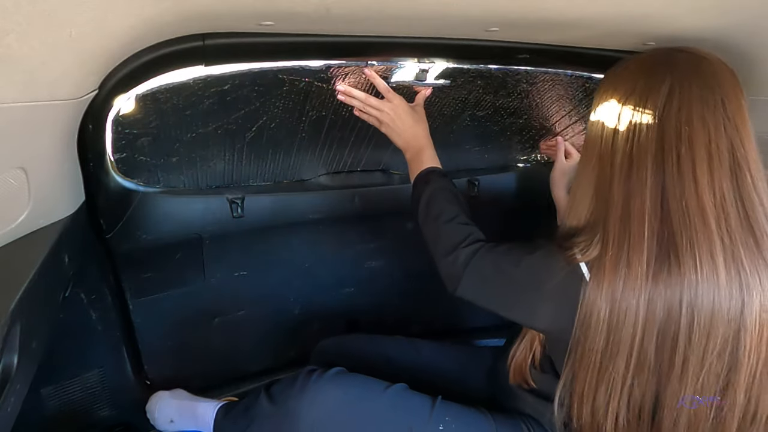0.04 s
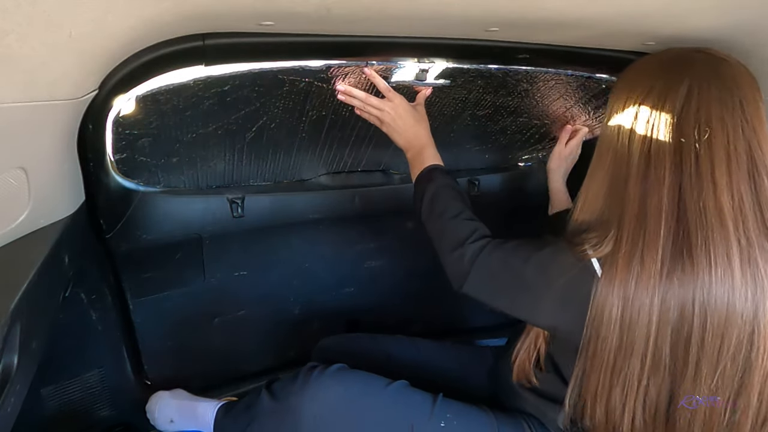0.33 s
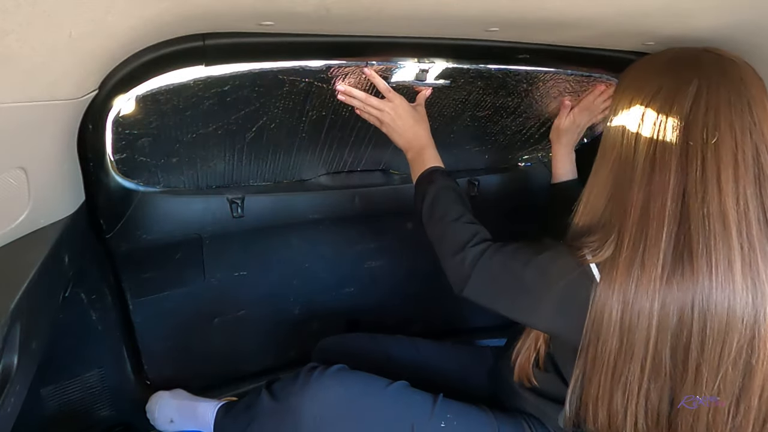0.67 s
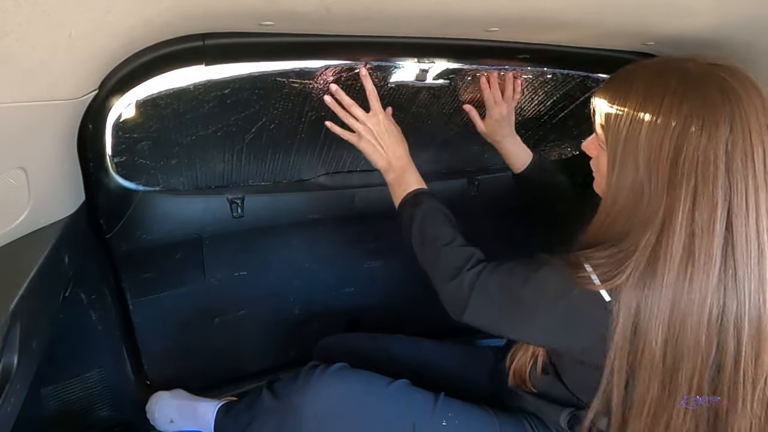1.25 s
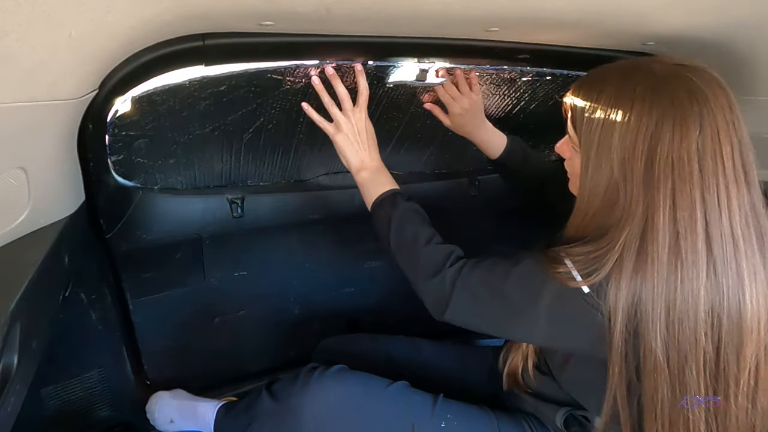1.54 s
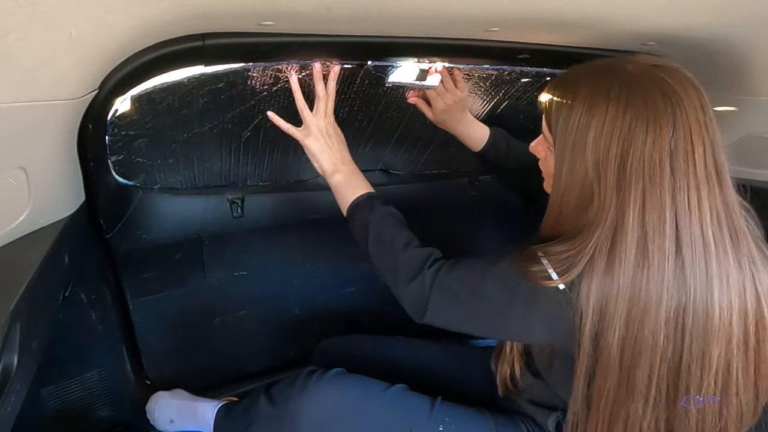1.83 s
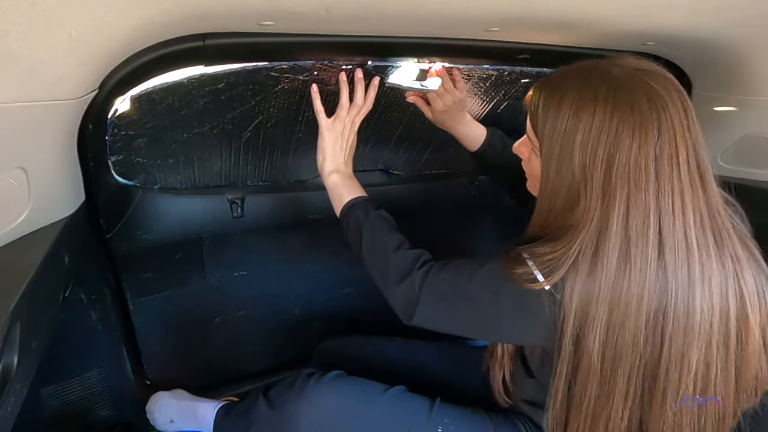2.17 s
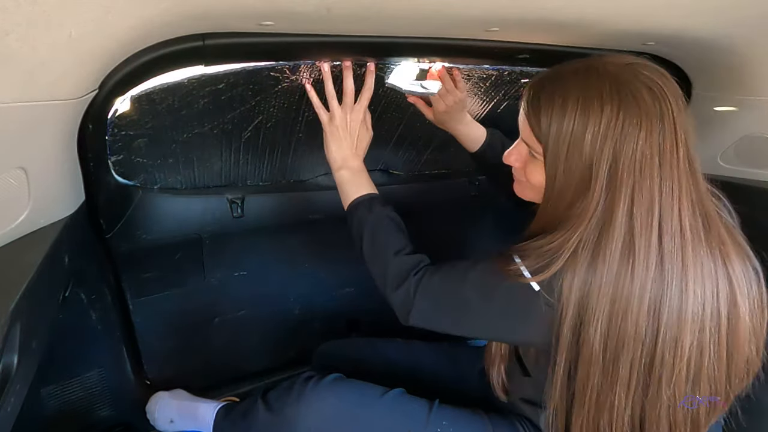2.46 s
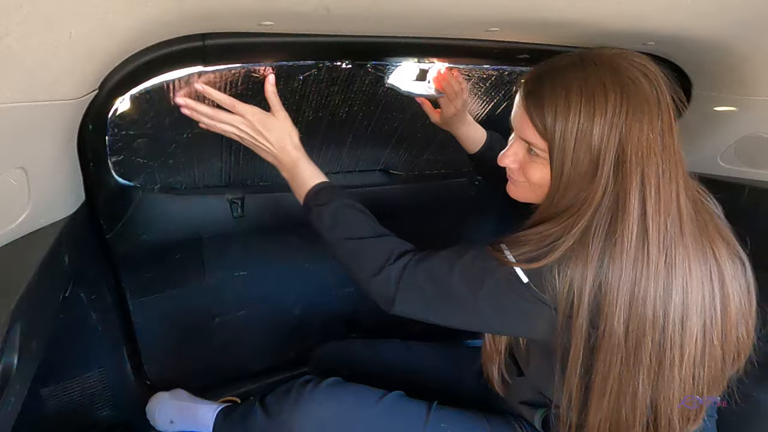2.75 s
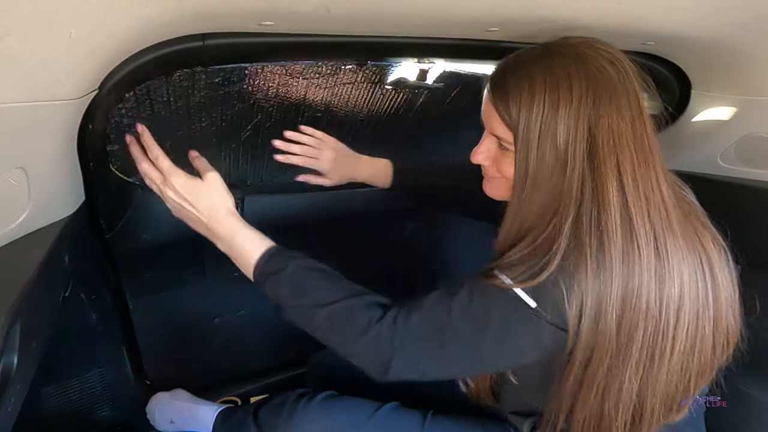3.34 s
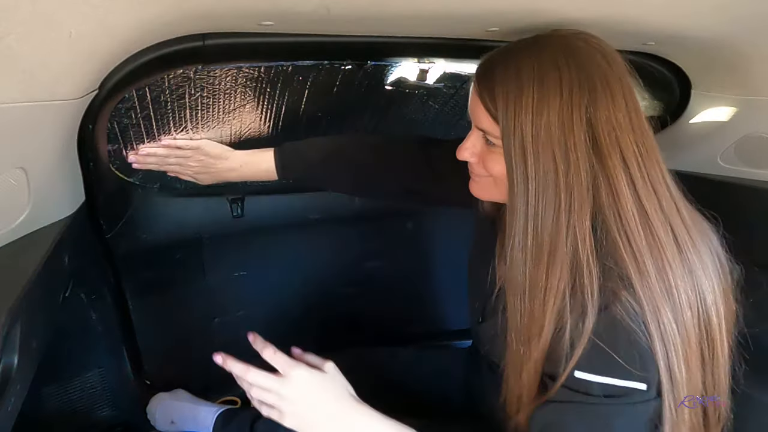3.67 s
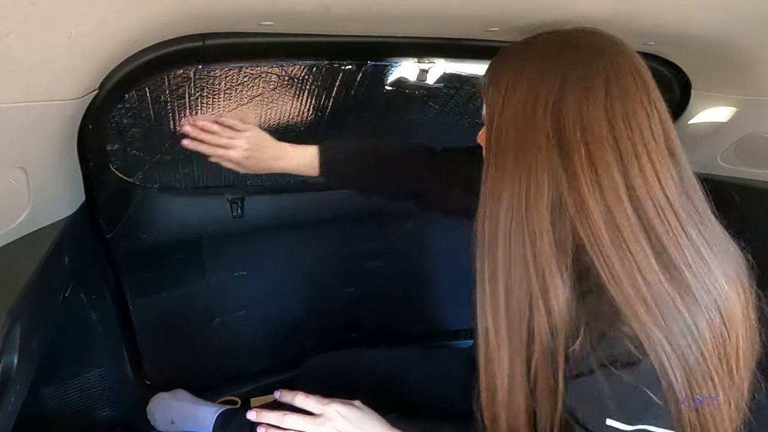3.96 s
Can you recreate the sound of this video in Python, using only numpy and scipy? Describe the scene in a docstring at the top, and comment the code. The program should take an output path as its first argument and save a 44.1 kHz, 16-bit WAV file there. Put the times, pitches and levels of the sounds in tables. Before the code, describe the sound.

A foil insulation sheet crackles under rubbing hands, close up inside a quiet car. During the first second, short rustles come with soft thumps and scuffs on the trim. A sharp snap at 1.3 seconds leads into longer rubbing, thinning to separate clicks from about 2 seconds. Louder snaps come near 2.6 and around 3 seconds with faint thumps, then a last hissing rub from 3.6 to 3.8 seconds.

```python
"""A foil insulation sheet crackles as hands press and rub it into a side window of a parked car.
Countless tiny buckles tick over the hiss of sliding skin, and larger creases flip with a sharp snap.
The trim behind the sheet thumps under the palms and scuffs under the fingers.
The small padded cabin answers each click briefly; the sound is almost mono."""
import sys
import numpy as np
from scipy import signal
from scipy.fft import rfft, irfft, next_fast_len
from scipy.io import wavfile
from scipy.ndimage import uniform_filter1d, map_coordinates

SR = 44100
rng = np.random.default_rng(int(sys.argv[2]) if len(sys.argv) > 2 else 0)


def put_to_file(sound):
    """Save the sound as 16-bit audio at rate SR, in the file named by the first command-line argument."""
    columns = np.atleast_2d(sound).T  # one column per channel
    safe = np.clip(columns, -1, 1)
    whole_steps = np.round(safe * 32767)
    wavfile.write(sys.argv[1], SR, whole_steps.astype(np.int16))


N = 176400

# tone of a foil click's crisp layer and of its duller flex: (frequency [Hz], relative level [dB])
CRISP_TONE = [(1500, -26), (3500, -5), (5000, -8.5), (7000, -2), (8500, 3.5), (9300, -6), (10600, -11.5),
              (12000, -4.5), (12600, -10.5), (16000, -19)]
DULL_TONE = [(60, -20), (180, -9.5), (500, -4.5), (650, -9), (1000, -8.5), (1350, -1), (3600, 0.5),
             (5200, -2.5), (10000, -54.5)]


def amp(db):
    """Decibels to gain."""
    return 10 ** (np.asarray(db) / 20)


def unit(x):
    """Scale to rms 1."""
    return x / np.sqrt(np.mean(x ** 2) + 1e-20)


def eq_gain(curve, hz):
    """Gain of an EQ curve drawn through (Hz, dB) points on a log frequency axis."""
    points_hz, db = np.transpose(curve)
    return amp(np.interp(np.log(hz + 1), np.log(points_hz + 1), db))


def filtered(x, response):
    """Filter x by a gain given as a function of frequency."""
    size = next_fast_len(N + SR // 2)
    return irfft(rfft(x, size) * response(np.fft.rfftfreq(size, 1 / SR)), size)[..., :N]


def add(track, start, sound):
    """Mix a sound into the track, start seconds in."""
    part = track[max(round(start * SR), 0):][:len(sound)]
    part += sound[:len(part)]


def wobble(per_s):
    """A smooth random curve through per_s points a second."""
    points = rng.standard_normal(int(N * per_s / SR) + 4)
    return map_coordinates(points, [np.arange(N) * per_s / SR])


def resonate(x, hz, width_hz):
    """Ring one resonance whose centre may glide; comes out at rms 1."""
    turn = np.exp(2j * np.pi * np.cumsum(np.broadcast_to(hz, N)) / SR)
    pole = np.exp(-np.pi * width_hz / SR)
    return unit(np.real(turn * signal.lfilter([1], [1, -pole], x / turn)))


def cabin_tone(level_db=-62):
    """The quiet cabin: a faint bed of bass-heavy noise."""
    # tone of the bed: (frequency [Hz], relative level [dB])
    bed_tone = [(20, 3.5), (300, -23.5), (1000, -22.5), (4000, -31.5), (16000, -42)]
    return amp(level_db) * unit(filtered(rng.standard_normal(N), lambda hz: eq_gain(bed_tone, hz)))


def finger_scuffs(rise_s=0.0063, t60_s=0.097, stage_q=1.75):
    """Brief bursts of finger friction in a hollow resonance of the trim."""
    # scuffs on the trim: (time [s], level [dB], resonance [Hz])
    scuffs = [(.094, -31, 607), (.295, -45, 690), (0.673, -50, 617), (0.931, -53, 540), (3.319, -39.5, 820)]
    out, t = np.zeros(N), np.arange(SR // 4) / SR
    envelope = (1 - np.exp(-t / rise_s)) * amp(-60 * t / t60_s)
    for start, db, hz in scuffs:
        b, a = signal.iirpeak(hz, stage_q, SR)
        friction = rng.standard_normal(len(t))
        scuff = unit(signal.lfilter(b, a, signal.lfilter(b, a, friction)))
        add(out, start, amp(db) * scuff * envelope / envelope.max())
    return out


def palm_thumps(rise_s=0.01, reach_octaves=0.53, rumble_db=-4, rumble_t60_s=0.33):
    """Soft pushes ring the trim's modes near each push's pitch; the panel rumbles on as it flexes."""
    # palm presses on the trim: (time [s], level [dB], centre of the push [Hz])
    presses = [(.045, -43, 180), (0.091, -31.5, 188), (.298, -38.5, 275), (0.396, -43.5, 48),
               (0.509, -37, 113), (.575, -43.5, 304), (0.779, -37.5, 53), (0.792, -33.5, 119),
               (0.873, -42, 115), (0.994, -50, 367), (1.277, -45, 153), (1.304, -40, 67), (2.16, -58, 214),
               (2.635, -46.5, 194), (2.88, -49, 130), (2.965, -45, 185), (3.06, -50.5, 138),
               (3.204, -40, 56.7), (3.564, -52, 64), (3.768, -57.5, 400)]
    # modes of trim and cabin: (frequency [Hz], relative level [dB], 60 dB decay time [s])
    trim_modes = [(48, -4.5, 0.47), (74, -3, 0.14), (115, 3.5, 0.19), (142.6, 7, 0.098),
                  (196.7, -1.5, 0.19), (239.5, -6.5, 0.12), (314, -2.5, 0.071), (369.4, 2.5, 0.091)]
    out, t = np.zeros(N), np.arange(SR // 2) / SR
    mode_hz, mode_db, t60_s = np.transpose(trim_modes)[:, :, None]
    hz = np.fft.rfftfreq(len(t), 1 / SR) + 1
    attack = 1 - np.exp(-(t / rise_s) ** 2)
    for start, db, centre_hz in presses:
        gains = amp(mode_db) * np.exp(-np.abs(np.log2(mode_hz / centre_hz)) / reach_octaves)
        tones = np.sin(2 * np.pi * (mode_hz * t + rng.random(mode_hz.shape)))
        ring = attack * (gains * amp(-60 * t / t60_s) * tones).sum(0)
        ring /= np.sqrt(uniform_filter1d(ring ** 2, size=600).max())  # rms 1 at its loudest
        band = np.exp(-2 * np.log2(hz / centre_hz) ** 2)
        flex = unit(irfft(rfft(rng.standard_normal(len(t))) * band, len(t)))
        rumble = attack * flex * amp(rumble_db - 60 * t / rumble_t60_s)
        add(out, start, amp(db) * (ring + rumble))
    return out


def cabin_response(size, tail_db=-0.9, build_s=0.00045, t60_s=0.058):
    """The direct sound, then a tail of reflections that the padding soon soaks up."""
    t = np.arange(size) / SR
    response = rng.standard_normal(size) * amp(-60 * t / t60_s) * (1 - np.exp(-t / build_s))
    response *= amp(tail_db) / np.linalg.norm(response)
    response[0] = 1
    return response


def buckle(tone, size=4096, colour_spread_db=3, pitch_spread=0.061):
    """One foil click of energy 1: a sharp tick with its own colour and pitch, heard in the cabin."""
    hz = np.fft.rfftfreq(size, 1 / SR)
    colour_db = colour_spread_db * np.interp(hz, np.linspace(0, SR / 2, 24), rng.standard_normal(24))
    detune = np.exp(pitch_spread * rng.standard_normal())
    spectrum = eq_gain(tone, hz * detune) * amp(colour_db)
    # minimum phase packs the energy into the attack
    cepstrum = irfft(np.log(spectrum))
    cepstrum[1:size // 2] *= 2
    cepstrum[size // 2 + 1:] = 0
    tick = irfft(np.exp(rfft(cepstrum)))
    click = signal.fftconvolve(tick, cabin_response(size))[:size]
    return click / np.linalg.norm(click)


def crease_snaps(boost_db=9.5, chain_clicks=3, chain_gap_s=0.003, chain_step_db=-6.5):
    """Larger creases flip, each setting off weaker neighbours; returns the crisp and dull layers."""
    # snapping creases: (time [s], relative level [dB], dull over crisp [dB])
    snaps = [(0.3317, -24.5, 5.5), (0.8162, -23.5, -5), (1.189, -26, -25), (1.2859, -14.5, -6.5),
             (1.3186, -22.5, 1), (1.4189, -20.5, -7.5), (1.4469, -29, -3), (1.473, -34, -15),
             (1.8199, -25, -6.5), (1.9046, -25, -7), (1.929, -24.5, -9.5), (2.0045, -33, -23),
             (2.066, -29, -15), (2.0823, -32.5, -13), (2.1639, -44, 5), (2.2029, -43, 0.5),
             (2.363, -35, -26), (2.387, -28.5, -15), (2.4264, -31, -12), (2.540, -29, -5),
             (2.568, -33.5, 6), (2.582, -27, -7), (2.616, -32, 6), (2.6354, -15.5, -5), (2.9354, -17.5, -1),
             (2.9859, -21.5, -7.5), (3.0458, -23.5, -22), (3.0997, -15, -19), (3.2628, -28, -15),
             (3.8888, -30, -24)]
    crisp, dull = np.zeros((2, N))
    for start, db, dull_over_db in snaps:
        for k in range(chain_clicks):
            gain = amp(db + boost_db + k * chain_step_db)
            add(crisp, start, gain * buckle(CRISP_TONE))
            add(dull, start, gain * amp(dull_over_db) * buckle(DULL_TONE))
            start += chain_gap_s * (.5 + rng.random())
    return np.array([crisp, dull])


def rub_envelopes(rise_s=0.013, fall_s=0.018, taper=0.76, idle_db=-78.0):
    """Each rub swells, holds and lets the foil settle; returns the crisp and dull envelopes in dB."""
    # rubs over the sheet: (start [s], end [s], relative crisp level [dB], dull over crisp [dB])
    rubs = [(0, 0.105, -31, -1), (0.131, 0.202, -38, -1), (0.22, 0.33, -40, -4.5),
            (0.349, 0.401, -38.5, -1), (0.526, 0.561, -37, -0.5), (0.681, .76, -52.5, 0),
            (0.774, 0.785, -34.5, -3.5), (0.819, 0.838, -45.5, -0.5), (0.858, 0.994, -55, -7),
            (0.973, 1.049, -46, -1), (1.12, 1.164, -60, -1), (1.186, 1.276, -43.5, -4.5),
            (1.261, 1.305, -37, -2), (1.325, 1.396, -49.5, -1), (1.444, 1.679, -39.5, -9),
            (1.707, 1.945, -43, -8), (1.96, 2.127, -55, -3.5), (2.429, 2.504, -41.5, -2.5),
            (2.57, 2.627, -48, 4.5), (2.68, 2.856, -69, 6.5), (2.874, 2.908, -43, -1.5),
            (2.904, 2.975, -38, -4), (3.065, 3.087, -38.5, -5.5), (3.203, 3.208, -33, -1),
            (3.302, 3.344, -49, -3), (3.561, 3.79, -40.5, -3), (3.788, 3.861, -50.5, -1),
            (3.957, 3.994, -43, -4.5)]
    t = np.arange(N) / SR
    crisp_db, dull_db = np.full((2, N), idle_db)
    for start, end, db, dull_over_db in rubs:
        fade = np.maximum(start - t, 0) / rise_s + np.maximum(t - end, 0) / fall_s
        level_db = db - 10 * fade ** taper
        crisp_db = np.maximum(crisp_db, level_db)
        dull_db = np.maximum(dull_db, level_db + dull_over_db)
    return crisp_db, dull_db


def crackle(creases=28, creases_per_s=35, trim_db=-1):
    """Buckles over the hiss of sliding skin, denser on harder rubs; returns the crisp and dull layers."""
    base_per_s, base_db, density_growth = 1500, -41.5, 0.86
    size_spread_db, layer_spread_db, even_s = 6, 4.5, .035
    slide_db, catch_db = -6.5, 1.5
    crisp_db, dull_db = rub_envelopes()
    t = np.arange(N) / SR
    # pressing fingertips make fewer, more distinct buckles than a sweeping palm
    fingertips = (t > 1.88) & (t < 2.66)
    density = np.where(fingertips, .4, 1) * amp(density_growth * (crisp_db - base_db))
    chance = base_per_s * density / SR
    fires = rng.random(N) < chance
    sizes = fires * amp(size_spread_db * np.minimum(rng.standard_normal(N), 2))
    slide = amp(slide_db) * np.sqrt(density)
    # the hands move on from crease to crease, each with a click of its own
    scatter = 2 * (rng.random(N) + rng.random(N))
    crease = (t * creases_per_s + scatter).astype(int) % creases
    drives, clicks = [], []
    for tone, db in ((CRISP_TONE, crisp_db), (DULL_TONE, dull_db)):
        pulses = sizes * amp(layer_spread_db * rng.standard_normal(N))
        power = np.abs(uniform_filter1d(pulses ** 2, int(even_s * SR) + 1))
        pulses /= np.sqrt(power + chance / 2)  # the hand's pressure evens out the buckling
        hiss = slide * rng.standard_normal(N)
        drives.append(amp(db + trim_db) * (pulses + hiss) / np.hypot(1, slide))
        clicks.append([buckle(tone) for _ in range(creases)])
    catch = unit(amp(catch_db * wobble(per_s=120)))  # skin catches and slips
    layers = np.zeros((2, N))
    for layer, drive, bank in zip(layers, drives, clicks):
        for k, click in enumerate(bank):
            layer += signal.oaconvolve(drive * catch * (crease == k), click)[:N]
    return layers


def foil(patch_db=-8.5, hollow_db=-11.5, hollow_until_s=.74):
    """Crackle and snaps; their dull layer rings the sheet and, at first, hollow trim behind it."""
    # gliding ring of the patch of sheet under the hands: (time [s], frequency [Hz])
    patch_glide = [(.78, 2990), (1.25, 2730), (1.6, 3230), (1.78, 2300), (2.7, 2200), (3.0, 3260),
                   (3.57, 2180)]
    crisp, dull = crackle() + crease_snaps()
    t = np.arange(N) / SR
    patch_hz = np.interp(t, *np.transpose(patch_glide))
    patch = resonate(dull, patch_hz, width_hz=460)
    hollow = resonate(dull * (t < hollow_until_s), hz=661, width_hz=55)
    body = unit(unit(dull) + amp(patch_db) * patch) + amp(hollow_db) * hollow
    return crisp + dull.std() * body


def scene(side_db=-47.5):
    """Cabin, foil and trim, with a trace of width from a copy shifted 90 degrees in phase."""
    mid = cabin_tone() + foil() + palm_thumps() + finger_scuffs()
    side = amp(side_db) * filtered(mid, lambda hz: 1j * np.sign(hz))
    return np.array([mid + side, mid - side])


def record(dry):
    """A brick-wall low-pass takes off the very top of the treble."""
    return filtered(dry, lambda hz: hz < 15900)


dry = scene()
out = record(dry)
put_to_file(out)
```